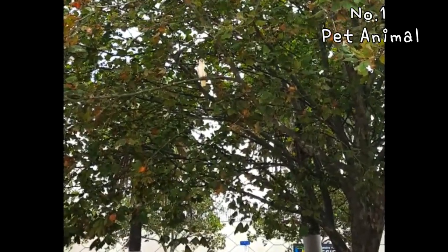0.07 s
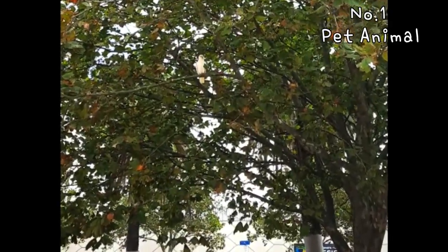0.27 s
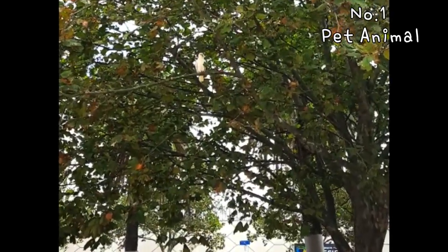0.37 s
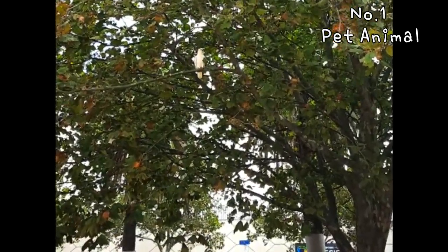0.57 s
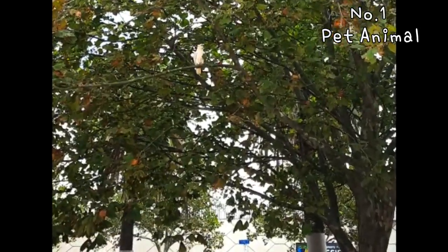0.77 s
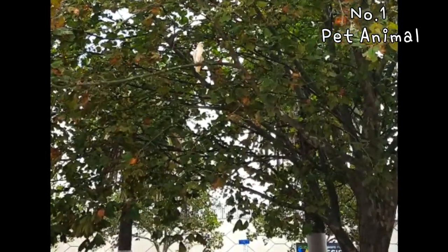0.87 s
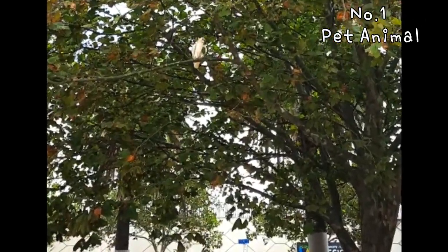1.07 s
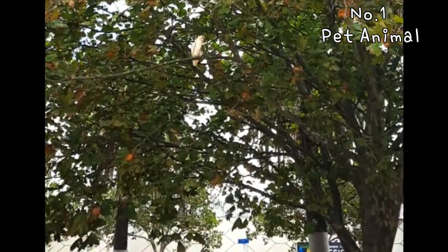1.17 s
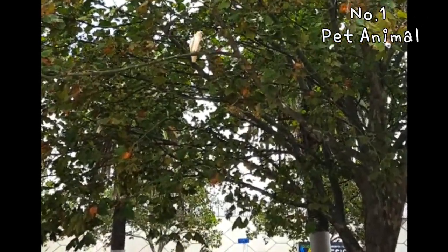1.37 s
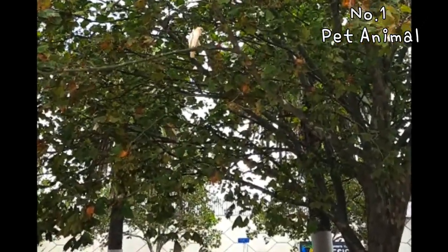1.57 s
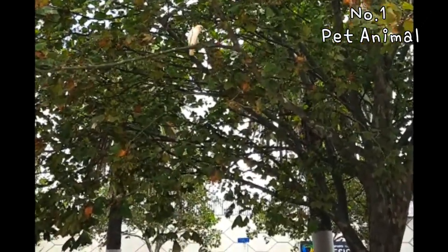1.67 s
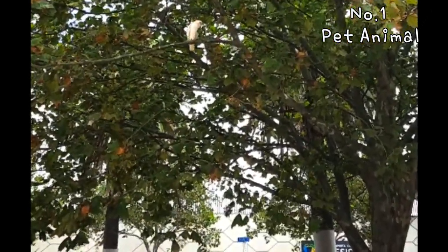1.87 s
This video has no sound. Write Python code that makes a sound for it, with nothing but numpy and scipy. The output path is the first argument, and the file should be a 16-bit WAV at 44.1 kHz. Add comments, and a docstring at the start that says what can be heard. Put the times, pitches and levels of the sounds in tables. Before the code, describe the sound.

A cockatoo screeches once, from about 0.4 to 1.05 seconds: a rasping upward start, a loud, bright, nasal cry cracking near 0.63, then a steady held pitch and a short rasp at the end. Trees and ground return faint echoes that fade afterward. Throughout, low traffic rumbles, a far engine slowly speeds up, and wind bumps the left side near 0.2, 0.5, 1.05, 1.3 and 1.5.

```python
"""In a park, a cockatoo screeches from high in a tree: a rasping start, a loud pitched cry that cracks
at its top, and a rasp as it closes. The cry is a harmonic series shaped by throat resonances, with pulsed hiss;
trunks and ground throw it back as delayed copies and the park lets it die away as decaying noise.
Far off an engine, a few harmonics of its firing rate, slowly speeds up over a traffic rumble of shaped noise,
and puffs of air, short damped swings of pressure, bump the left side of the microphone."""
import sys
import numpy as np
from scipy import signal
from scipy.fft import rfft, irfft
from scipy.io import wavfile

SR = 44100
rng = np.random.default_rng(int(sys.argv[2]) if len(sys.argv) > 2 else 0)


def unload_audio(sound):
    """Save the sound as a 16-bit wav file, at the path given as the first command line argument."""
    columns = np.transpose(np.atleast_2d(sound))
    # keep every value between -1 and 1, then stretch to whole-number steps
    steps = np.round(np.clip(columns, -1, 1) * 32767)
    wavfile.write(sys.argv[1], SR, steps.astype(np.int16))


N = 83790  # samples
TIME = np.arange(N) / SR  # s
BIN_HZ = np.arange(N // 2 + 1) * SR / N  # frequencies of the spectrum


def from_db(db):
    """Amplitude gain is ten to the power of the level in decibels over 20."""
    return 10 ** (np.asarray(db) / 20)


def rms_one(x):
    """Normalisation to unit mean power, over all channels together."""
    return x / np.sqrt(np.mean(x ** 2) + 1e-20)


def in_time(rows):
    """Linear interpolation of each column of a time curve at every sample."""
    seconds, *columns = np.transpose(rows)
    return [np.interp(TIME, seconds, column) for column in columns]


def at_hz(points, hz):
    """Interpolation on a log-frequency axis, where equal intervals are equal steps."""
    table_hz, value = np.transpose(points)
    return np.interp(np.log(np.maximum(hz, 1)), np.log(table_hz), value)


def pan(left_minus_right_db):
    """Stereo placement by level difference, half of it given to each side."""
    return from_db(np.array([[.5], [-.5]]) * left_minus_right_db)


def drift(hz):
    """Random wandering: white noise through a two-pole low-pass, scaled to spread 1."""
    pole = np.exp(-2 * np.pi * hz / SR)
    noise = rng.standard_normal(2 * N)
    smooth = signal.lfilter([1], [1, -2 * pole, pole * pole], noise)
    return rms_one(smooth[N:])  # the first half lets the filter settle


def coloured(spectrum, channels=2):
    """Spectral shaping: independent white noises weighted in the frequency domain, to unit power."""
    white = rfft(rng.standard_normal((channels, N)))
    return rms_one(irfft(white * from_db(at_hz(spectrum, BIN_HZ)), N))


def delayed(x, seconds):
    """Propagation delay, to the nearest whole sample."""
    return np.interp(np.arange(N) - np.round(seconds * SR), np.arange(N), x, left=0)


def traffic():
    """Partial coherence: a steady rumble, alike on both sides in the bass, with a wide faint hiss on top."""
    # Spectrum of rumble and hiss. Each row: frequency in Hz, relative level in dB per Hz.
    rumble_spectrum = [(25, -32), (40, -11), (60, 0), (100, 0), (170, -8), (230, -13.5), (330, -11.5),
                       (450, -22.5), (900, -26.5), (1800, -37.5), (3500, -46.5), (6300, -45), (8000, -50.5),
                       (10000, -59), (15000, -60)]
    # Correlation of the two sides. Each row: frequency in Hz, left-right likeness from 0 to 1.
    likeness = [(40, 0.82), (90, .8), (300, 0.76), (1000, .5), (4000, .2), (12000, .1)]
    level_db, pan_db = -41.5, 1
    alike = np.clip(at_hz(likeness, BIN_HZ), -1, 1)
    mid, side = rfft(coloured(rumble_spectrum))
    common = np.sqrt(1 + alike) * mid
    opposed = np.sqrt(1 - alike) * side * np.array([[1], [-1]])
    both = irfft(common + opposed, N)
    return rms_one(both) * from_db(level_db) * pan(pan_db)


def engine():
    """Harmonic orders of the firing rate: the low ones of a far engine, slowly speeding up and wavering."""
    # Course of the engine. Each row: time in seconds, firing rate in Hz, level in dB.
    speeding_up = [(0, 75.6, -47), (.2, 77.1, -45.5), (.35, 79.04, -39), (.6, 80.16, -34),
                   (.8, 81.77, -38.5), (.87, 84.33, -41.5), (1.0, 85.2, -38), (1.17, 86.6, -43),
                   (1.33, 87.47, -35), (1.58, 88.3, -35), (1.75, 88.8, -45), (1.9, 90.5, -50.5)]
    # Engine orders. Each row: multiple of the firing rate, mean relative level in dB.
    orders = [(1, 0), (2, -14), (3, -24), (4, -23)]
    pan_db = 4.5
    firing_hz, level_db = in_time(speeding_up)
    unsteady_hz = firing_hz * (1 + .012 * drift(11.1))
    phase = 2 * np.pi * np.cumsum(unsteady_hz) / SR
    hum = 0
    for multiple, order_db in orders:
        gain = from_db(order_db + 1.5 * drift(11))
        hum = hum + gain * np.sin(round(multiple) * phase)
    return np.sqrt(2) * hum * from_db(level_db) * pan(pan_db)  # sqrt(2): a sine to unit power


def puffs():
    """Damped oscillation: each puff is a brief low swing of pressure, mostly on the left."""
    # Puffs of air. Each row: start in seconds, envelope peak on the left in dB, swing rate in Hz.
    gusts = [(.025, -23.5, 86.5), (.229, -14.5, 138), (0.515, -20, 125), (1.041, -20, 100.2),
             (1.316, -17.5, 129.9), (1.327, -19.5, 159.7), (1.359, -24.5, 230), (1.526, -21.5, 100),
             (1.675, -32, 130.8)]
    rise_cycles, right_db = 0.65, -29  # cycles up to the envelope peak; right side relative to left
    out = 0
    for start_s, peak_db, hz in gusts:
        cycles = np.maximum(TIME - start_s, 0) * hz
        age = cycles / rise_cycles
        envelope = (age * np.exp(1 - age)) ** 2
        out = out + from_db(peak_db) * envelope * np.sin(2 * np.pi * cycles)
    return out * from_db([[0], [right_db]])


def cockatoo():
    """Source and filter: harmonics through the throat; roughness shakes pitch and level, adds pulsed hiss."""
    # Pitch of the cry. Each row: time in seconds, pitch in Hz.
    pitch_curve = [(.365, 424.7), (.383, 480), (.402, 553), (.425, 556.8), (.456, 571.4), (.464, 634),
                   (.479, 631), (.503, 649.8), (.53, 687), (.55, 695.5), (.58, 685.4), (.626, 712.5),
                   (.638, 682), (.662, 700.4), (.676, 655.3), (.73, 660.5), (.764, 643.8), (.795, 635.3),
                   (.90, 637.8), (.997, 634.4), (1.016, 659.8), (1.04, 576)]
    # Effort of the bird. Each row: time in seconds, level in dB, extra level of the treble in dB.
    effort = [(.365, -70, -7.5), (.388, -41.5, -3), (.399, -34, -8), (.424, -26, -6.5), (.446, -30, -2),
              (.48, -25.5, -2.5), (.52, -21, 2.5), (.60, -21, -1), (.66, -21.5, 0.5), (.735, -24, 1),
              (.81, -24.5, -8.5), (.88, -23, -1.5), (.98, -28.5, -7), (1.03, -26.5, -2.5), (1.042, -39, 4),
              (1.075, -66, -14)]
    # Roughness of the voice. Each row: time in seconds, roughness from 0 to 1.
    roughness = [(.38, .5), (.425, .55), (.442, .95), (.461, .95), (.471, .12), (.53, .04), (.621, .03),
                 (.629, .85), (.636, .45), (.643, .18), (.653, .16), (.661, .55), (.672, .55), (.681, .09),
                 (.78, .02), (1.0, .02), (1.015, .22), (1.03, 1)]
    # Opening of the beak. Each row: time in seconds, opening from 0 (narrow) to 1 (wide).
    beak = [(.43, 0.11), (.455, 0.53), (.475, 0.98), (.95, 0.82), (1.035, 0.33)]
    # Throat resonances, beak narrow. Each row: frequency in Hz, level in dB.
    narrow_throat = [(450, -39.5), (800, -8), (1120, -7), (1600, -14.5), (1950, -10.5), (2250, 7),
                     (2620, -14), (3400, -13), (4700, -7.5), (5500, -20.5), (6500, -19.5), (7900, -42.5),
                     (10000, -43.5), (12900, -26), (15000, -38.5)]
    # Throat resonances, beak wide. Each row: frequency in Hz, level in dB.
    wide_throat = [(450, -26), (660, -20), (1000, -17.5), (1290, -5), (1600, -12), (1900, -4.5),
                   (2150, 0.5), (2550, -1), (2850, -3), (3200, 1.5), (3480, -0.5), (3900, -23), (4500, -8),
                   (5100, -11.5), (5800, -15), (6500, -2), (7300, -20), (8300, -20.5), (9200, -48.5),
                   (10300, -28.5), (12000, -43.5), (14000, -34.5), (15500, -36)]
    # Extra level of the highest harmonics. Each row: time in seconds, level in dB.
    top_curve = [(.38, 1), (.45, 3), (.50, 5.5), (.56, 4.5), (.68, 1), (.76, -3.5), (1.0, -0.5),
                 (1.04, -1.5)]
    # Stereo balance of the harmonics. Each row: frequency in Hz, left minus right in dB.
    balance = [(650, -0.5), (1300, -1), (2000, -0.5), (2600, -2.5), (3300, -3), (4600, -6), (6500, -13),
               (8500, 0.5), (13000, -4)]
    treble_share = [(2800, 0), (6000, 1)]  # Hz, share of the treble level applied
    top_share = [(9200, 0), (13540, 1)]
    jitter, jitter_hz = 0.048, 250.4  # relative pitch spread at full roughness
    waver, waver_hz = .0015, 35  # relative pitch spread at all times
    sway_db, sway_hz = 1.3, 12  # each harmonic wavers a little in level
    flutter_hz, flutter_depth, shimmer = 207.9, 0.27, 0.55  # beating membranes at full roughness
    hiss_db = -5.5  # turbulent air at full roughness, before it is pulsed, relative to the voice

    pitch, = in_time(pitch_curve)
    top_db, = in_time(top_curve)
    level_db, treble_db = in_time(effort)
    rough, wide = np.clip(in_time(roughness) + in_time(beak), 0, 1)
    shaken_hz = pitch * (1 + jitter * rough * drift(jitter_hz) + waver * drift(waver_hz))
    phase = 2 * np.pi * np.cumsum(shaken_hz) / SR

    voice, power = 0, 0
    for k in range(1, 27):
        hz = k * pitch
        throat_db = wide * at_hz(wide_throat, hz) + (1 - wide) * at_hz(narrow_throat, hz)
        throat_db = throat_db + sway_db * drift(sway_hz)
        throat_db = throat_db + top_db * at_hz(top_share, hz)
        gain = from_db(throat_db + treble_db * at_hz(treble_share, hz))
        voice = voice + gain * pan(at_hz(balance, hz)) * np.sin(k * phase)
        power = power + gain ** 2 / 2

    flutter = np.sin(2 * np.pi * np.cumsum(flutter_hz * (1 + .12 * drift(35))) / SR)
    beating = 1 + rough * (flutter_depth * flutter + shimmer * drift(210))
    voice = voice / np.sqrt(power) * beating
    wide_air = np.sqrt(wide) * coloured(wide_throat, channels=1)
    narrow_air = np.sqrt(1 - wide) * coloured(narrow_throat, channels=1)
    pulses = 1 + np.cos(phase)  # one burst of air per pitch cycle
    hiss = (wide_air + narrow_air) * pulses * rough * from_db(hiss_db)
    calling = (TIME > effort[0][0]) * (TIME < effort[-1][0])
    return (voice + hiss) / np.sqrt(1 + rough ** 2 / 2) * from_db(level_db) * calling


def park(cry):
    """Reflection and reverberation: ground bounce, dull echoes, scatter from leaves and a long faint tail."""
    # Echoes from branches and trunks. Each row: delay left and delay right in seconds,
    # level left and level right in dB relative to the dulled cry.
    echo_rows = [(.0095, .0079, -26.5, -12), (0.0178, .0156, -19.5, -18), (0.0312, .0304, -12.5, -22.5),
                 (.047, .055, -25, -17.5), (.112, .116, -15, -38), (.235, .228, -28.5, -32)]
    # Ring of the park. Each row: frequency in Hz, time to fall by 60 dB in seconds.
    ring_t60 = [(500, 1.0), (2000, 1), (4000, 0.54), (8000, 0.17), (15000, 0.16)]
    ground_left_s, ground_right_s = .00533, .00492
    ground_db = -5  # strong first bounce: harmonics swell and fade as they glide
    left_lag_s = .00008  # the cry and its ground bounce reach the left side later
    echo_cut_hz = 6800
    tail_db = -17.5  # total energy of the response
    leaves_db, leaves_t60_s = -14.5, .3

    bounce = np.array([delayed(cry[0], ground_left_s), delayed(cry[1], ground_right_s)])
    near = cry + from_db(ground_db) * bounce
    near = np.array([delayed(near[0], left_lag_s), near[1]])

    dull = signal.sosfilt(signal.butter(1, echo_cut_hz, fs=SR, output="sos"), cry)
    echoes = 0
    for left_s, right_s, left_db, right_db in echo_rows:
        left = from_db(left_db) * delayed(dull[0], left_s)
        right = from_db(right_db) * delayed(dull[1], right_s)
        echoes = echoes + np.array([left, right])

    edges, tail = np.geomspace(300, 16000, 7), 0  # Hz
    for low, high in zip(edges, edges[1:]):
        band_pass = signal.butter(2, [low, high], "band", fs=SR, output="sos")
        band = signal.sosfilt(band_pass, rng.standard_normal((2, N)))
        t60 = at_hz(ring_t60, np.sqrt(low * high))
        tail = tail + band * np.exp(-np.log(1000) * TIME / t60)
    leaves = rng.standard_normal((2, N)) * np.exp(-np.log(1000) * TIME / leaves_t60_s)
    ringing = signal.fftconvolve(dull, from_db(tail_db) * rms_one(tail), axes=1)
    rustle = signal.fftconvolve(cry, from_db(leaves_db) * rms_one(leaves), axes=1)
    scatter = (ringing + rustle)[:, :N] / np.sqrt(N)  # sqrt(N): responses to unit energy
    return near + echoes + scatter


def scene():
    """Superposition: traffic, engine and puffs of air under the bird in its park."""
    return traffic() + engine() + puffs() + park(cockatoo())


def record(dry):
    """Band limiting: a steep elliptic low-pass cuts the top."""
    low_pass = signal.ellip(10, .2, 80, 15600, fs=SR, output="sos")  # ripple dB, stop dB, cutoff Hz
    return signal.sosfilt(low_pass, dry)


dry = scene()
out = record(dry)
unload_audio(out)
```